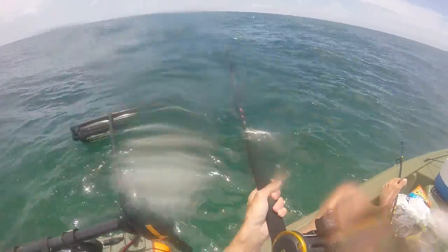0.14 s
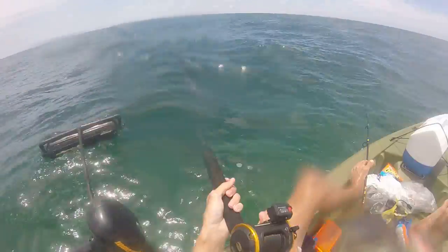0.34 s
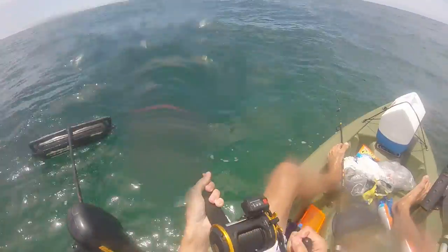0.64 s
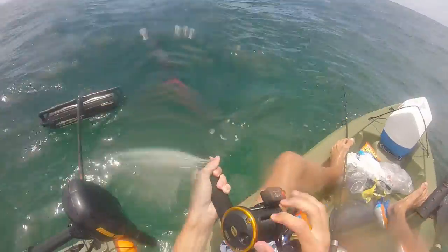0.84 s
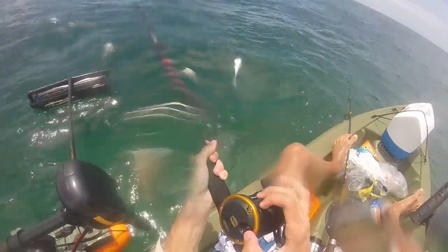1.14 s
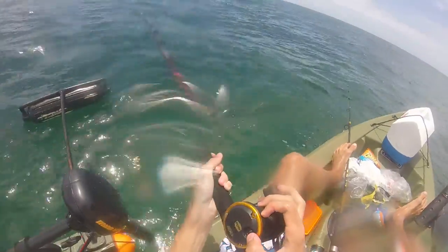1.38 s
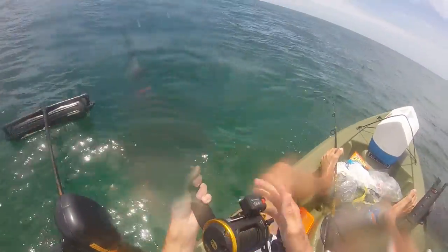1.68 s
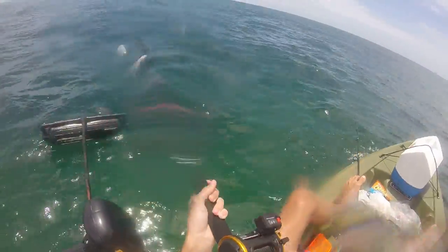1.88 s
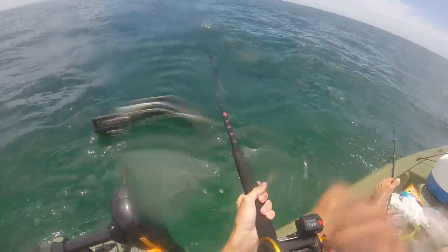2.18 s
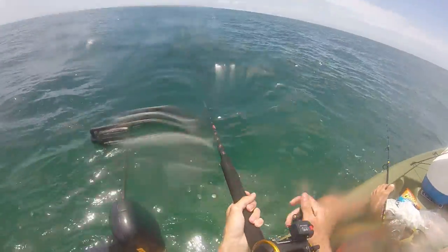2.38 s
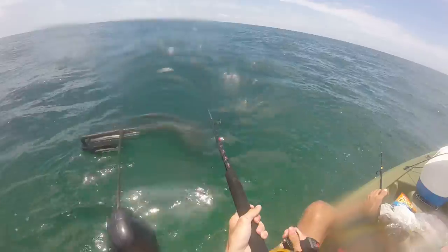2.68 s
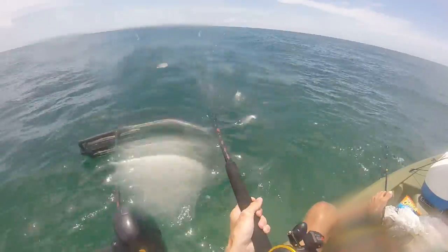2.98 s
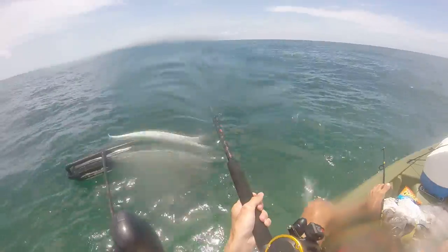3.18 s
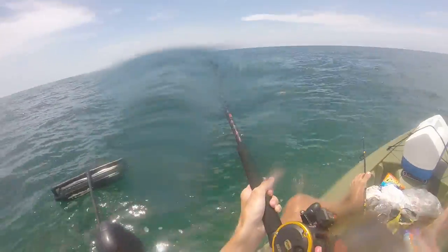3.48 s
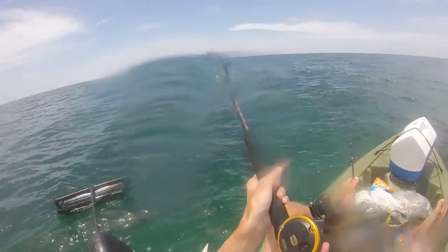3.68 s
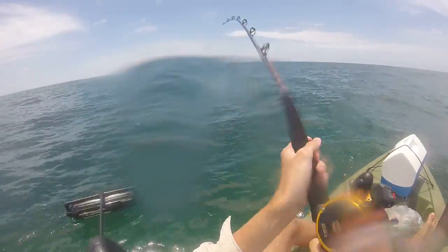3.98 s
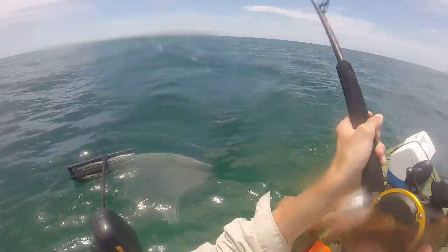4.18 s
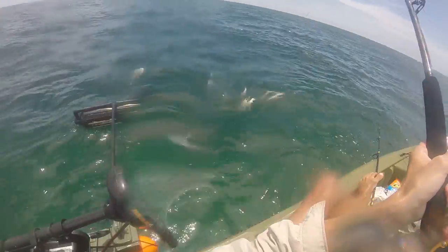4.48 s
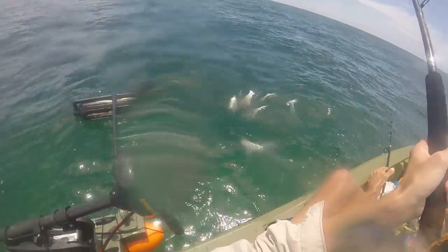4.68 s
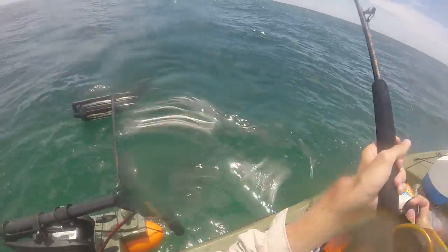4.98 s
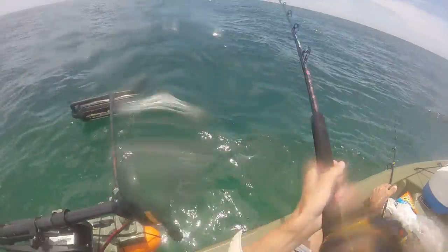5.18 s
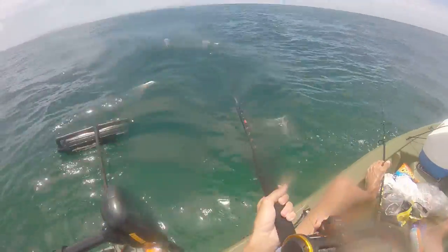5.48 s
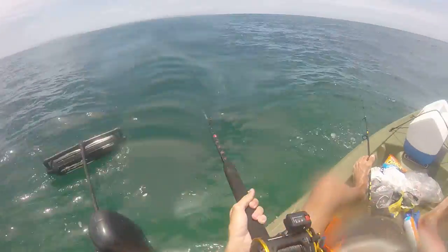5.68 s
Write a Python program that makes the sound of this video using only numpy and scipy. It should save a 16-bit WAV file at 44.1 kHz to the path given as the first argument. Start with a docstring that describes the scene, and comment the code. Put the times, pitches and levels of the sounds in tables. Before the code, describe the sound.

Metallic ratchet clicks from a fishing reel on a small boat come slowly, later whirring fast, with light handling ticks and low wind buffeting.

```python
"""A fishing reel in a small boat at sea, heard by a microphone shut in a waterproof case.
Throughout, wind buffets the case (low noise that swells and fades) and sea and recorder hiss evenly (shaped noise).
From the start, hands tick on the tackle (puffs of noise) and later also bump it (low dying tones).
At 2.1 s line is pulled out slowly: the clicker spring snaps over the gear teeth, and each snap rings the reel.
At 5.0 s it runs out faster, so that the snaps fuse into a buzz, then slows to single snaps again."""
import sys
import numpy as np
from scipy import signal
from scipy.fft import rfft, irfft
from scipy.io import wavfile
from scipy.ndimage import uniform_filter1d

SR = 44100
rng = np.random.default_rng(int(sys.argv[2]) if len(sys.argv) > 2 else 0)


def log_audio(samples):
    """Write samples as a 16-bit WAV file to the path given in sys.argv[1]."""
    # one column per channel
    frames = np.atleast_2d(samples).T
    # limit to full scale, then quantise
    limited = np.clip(frames, -1, 1)
    pcm = np.round(limited * 32767).astype(np.int16)
    wavfile.write(sys.argv[1], SR, pcm)


N = 257932  # length of the sound in samples


def from_db(db):
    """Turns a level in dB into a gain."""
    return 10 ** (np.asarray(db) / 20)


def rms_one(x):
    """Scales a sound to unit power."""
    return x / np.sqrt(np.mean(x ** 2) + 1e-20)


def band(x, low_hz, high_hz, order=2):
    """Keeps only the pitches between two limits."""
    limits = [low_hz, min(high_hz, .45 * SR)]
    return signal.sosfilt(signal.butter(order, limits, "band", fs=SR, output="sos"), x)


def add(out, s, sound):
    """Mixes a short sound in at a time in seconds."""
    at = round(s * SR)
    out[at:at + len(sound)] += sound[:N - at]


# Slow turns of the spool, each snap heard on its own: (time [s], level [dB])
SLOW_SNAPS = [(2.1071, -31.5), (2.1404, -33.5), (2.171, -34.5), (2.203, -36), (2.232, -35), (2.252, -34),
              (2.2686, -33.5), (2.2843, -28.5), (2.3015, -29), (2.3283, -30.5), (2.4006, -32),
              (2.4272, -32), (2.4441, -30.5), (2.4603, -32), (2.4792, -30), (2.5032, -32), (2.6074, -33.5),
              (5.4822, -30.5), (5.506, -30), (5.5233, -29.5), (5.5377, -29), (5.5515, -28.5),
              (5.5658, -28.5), (5.588, -29.5), (5.7147, -31.5)]
# Speed of the spool in the fast run: (time [s], speed [teeth per s])
RUN_SPEED = [(5.0091, 24.3), (5.062, 77.0), (5.08, 88.8), (5.147, 93.6), (5.202, 162.9), (5.242, 110.7),
             (5.257, 42.8), (5.288, 99.0), (5.385, 130.9), (5.445, 28.2), (5.455, 20)]
# Strength of the snaps in the fast run: (time [s], level [dB])
RUN_LEVEL = [(5.01, -33.5), (5.08, -33), (5.11, -33), (5.17, -28), (5.25, -31), (5.28, -30.5),
             (5.32, -30.5), (5.39, -29), (5.44, -29.5)]
RUN_SPREAD_DB = 1.0  # random difference from tooth to tooth


def teeth():
    """Time and level of every snap: the slow ones, and one for each tooth that passes in the run."""
    s, speed = np.transpose(RUN_SPEED)
    t = np.arange(s[0], s[-1], 1 / SR)
    # adding up the speed counts the teeth; a snap falls on each whole number
    passed = np.cumsum(np.interp(t, s, speed)) / SR
    times = np.interp(np.arange(int(passed[-1]) + 1), passed, t)
    levels_db = np.interp(times, *np.transpose(RUN_LEVEL))
    levels_db = levels_db + RUN_SPREAD_DB * rng.standard_normal(len(times))
    snaps = np.vstack([SLOW_SNAPS, np.transpose([times, levels_db])])
    return snaps[np.argsort(snaps[:, 0])]


# Ringing modes of the reel body, t60 being the time to fall by 60 dB if nothing else damped them:
# (pitch [Hz], level [dB], build-up [ms], t60 [ms])
REEL_MODES = [(1730, -24.5, 0.66, 11), (2103, -8, 2.74, 64), (2790, -6.5, 1.87, 28),
              (3458, 0.5, 0.97, 16.6), (4060, -14, 0.68, 8.3), (4622, -1.5, 1.07, 107),
              (5200, -8.5, 0.18, 21), (5687, 0, 0.73, 14.7), (6290, -14, 1.3, 23), (7380, -5.5, 0.13, 16),
              (7980, -1, 0.41, 5.9), (8620, -0.5, 0.18, 9.2), (9050, -5, 0.24, 10), (9970, -3, 0.7, 8.1),
              (11070, -14.5, 0.51, 12), (11880, -11, 0.23, 14.5), (12600, -15, .25, 10.5),
              (13500, -20, .2, 12), (14500, -24, 0.3, 10), (15600, -32, .2, 12)]
# Colour of the ring as the reel tilts, against the modes near 5.7 kHz: (time [s], near 2.2 kHz [dB],
# near 3.4 kHz [dB], near 4.6 kHz [dB], near 8 kHz [dB], above 10 kHz [dB])
COLOUR = [(2.107, -9, -2, -0.5, 1.5, -2), (2.14, 3.5, 4.5, 1, 2.8, 1), (2.235, -3, 6, 1, 2.5, 1),
          (2.29, 0.5, -2, 1, 2, -4), (2.43, 0, -3, -0.5, -1.2, 0.5), (2.49, 0, -7, 4, 3, 0),
          (2.61, 3.5, -4, 1, -2.5, 0), (5.01, -1, -4.3, -0.5, -2.5, 9), (5.11, 6, -1, 0.5, 1, 8),
          (5.16, 1.5, -4.5, 1.5, -2, 4), (5.21, 4, -4, 0.5, -4.5, -2), (5.25, 1.5, -5, 1, -5.5, 1.1),
          (5.31, 0, 4, -1.5, -1, 1), (5.39, -3, -1.5, -3, -6, -1.5), (5.43, -1, -2.5, -0.5, -4, -4),
          (5.54, -1.5, -3.5, 0.5, -3, -2), (5.6, 0, -4, 1, -2.5, -2), (5.72, -1, -4, 0, -1.5, -3.5)]
# Echoes off the hull: (delay [ms], level [dB])
ECHOES = [(9.9, -26.5)]
# the spring lands on the next flank and stifles the ring: 1 dB lost by then, growing as time squared
DAMPING_MS = 1.41
# the casing scatters each mode into a rough tail: level, t60 at 4 kHz, its power of pitch, half width
LINGER_DB, LINGER_T60_MS, LINGER_SLOPE, LINGER_HZ = -9.5, 24.6, -0.62, 257
# the ring wanders as the reel tilts, neighbouring teeth alike; pitch as a fraction
STRENGTH_SPREAD_DB, PITCH_SPREAD = .9, .006
TREBLE_WANDER = .018  # fraction of pitch: modes above 9 kHz also slide, over several teeth
PHASE_SPREAD = .85  # radians: the spring strikes nearly the same way each time


def clicker():
    """Every snap sets all modes of the reel going; the low ones mostly take longer to build up."""
    out, ms = np.zeros(N), np.arange(1600) * 1000 / SR
    hz, level_db, rise_ms, t60_ms = np.transpose(REEL_MODES)[:, :, None]
    snaps = teeth()
    when, *groups = np.transpose(COLOUR)

    # how the clear ring and the rough tail of each mode grow and die
    swell = 1 - np.exp(-(ms / np.maximum(rise_ms, .02)) ** 2)
    struck = swell * from_db(-60 * ms / t60_ms - (ms / DAMPING_MS) ** 2)
    linger_t60_ms = LINGER_T60_MS * (hz / 4000) ** LINGER_SLOPE
    linger = swell * from_db(LINGER_DB - 60 * ms / linger_t60_ms)
    white = rng.standard_normal((len(REEL_MODES), len(snaps), len(ms)))
    rough = [rms_one(band(w, f - LINGER_HZ, f + LINGER_HZ)) for w, f in zip(white, hz[:, 0])]

    # chance for strength, pitch and phase, averaged over neighbouring snaps
    chance = rng.standard_normal((len(snaps), 3, len(REEL_MODES), 1))
    chance = np.sqrt(3) * uniform_filter1d(chance, size=3, axis=0)
    slide = rng.standard_normal((len(snaps), len(REEL_MODES), 1))
    slide = rms_one(uniform_filter1d(slide, size=7, axis=0))
    chance[:, 1] += TREBLE_WANDER / PITCH_SPREAD * slide * (hz > 9000)
    own_phase = np.pi * np.arange(len(REEL_MODES))[:, None]  # neighbouring modes start in opposite sense

    group_hz = [2200, 3400, 4600, 5700, 7400, 8700, 10000]
    for (s, snap_db), (strength, pitch, phase), tail in zip(snaps, chance, np.swapaxes(rough, 0, 1)):
        lowest_db, low_db, middle_db, high_db, top_db = (np.interp(s, when, group) for group in groups)
        group_db = [lowest_db, low_db, middle_db, 0, high_db, high_db, top_db]
        tilt_db = np.interp(hz, group_hz, group_db)
        mode_hz = hz * (1 + PITCH_SPREAD * pitch)
        tone = np.sin(2 * np.pi * mode_hz * ms / 1000 + own_phase + PHASE_SPREAD * phase)
        rings = struck * tone + linger * tail
        mode_db = snap_db + level_db + tilt_db + STRENGTH_SPREAD_DB * strength
        add(out, s, np.sum(from_db(mode_db) * rings, axis=0))

    heard = out.copy()
    for lag_ms, echo_db in ECHOES:
        add(heard, lag_ms / 1000, from_db(echo_db) * out)
    return heard


# Hands and tackle: (time [s], level [dB], centre pitch [Hz], width [octaves])
TICKS = [(0.07, -49, 3980, 1.6), (.098, -48.5, 5730, 0.28), (0.099, -49, 1200, 1.6),
         (.112, -47.5, 2900, 0.53), (0.113, -50.5, 595, 1.4), (.314, -51.5, 2660, .2),
         (1.125, -42, 2450, 0.55), (1.125, -51, 6500, .8), (1.127, -46.5, 500, 0.94),
         (1.136, -47, 3500, 1.7), (1.23, -53, 1660, .3), (1.237, -39, 3400, 1.07), (1.238, -48, 9650, .62),
         (1.305, -44, 2140, 0.089), (1.307, -48, 5000, 1.6), (1.307, -44.5, 8400, 0.13),
         (1.318, -45, 4770, 1.5), (1.926, -48.5, 2020, 0.3), (1.938, -42.5, 5430, 1.1),
         (1.95, -47, 4600, .1), (2.887, -54, 4000, 1.3), (2.907, -43, 2600, 1.4),
         (4.381, -46.5, 8500, 0.65), (4.382, -50, 2070, 0.18), (4.543, -52, 6300, 1.2),
         (4.555, -45, 3380, 0.4), (4.946, -49.5, 2320, .57), (5.205, -51, 520, 0.96),
         (5.617, -42.5, 3300, .66)]
TICK_T60_MS, TICK_SLOPE = 16.8, -0.84  # at 4 kHz and 1 octave; low ticks last longer, by this power of pitch
TICK_RING = -0.19  # narrow ticks ring longer, by this power of the width


def ticks():
    """Short dying puffs of noise, each in the band of what was touched."""
    out, ms = np.zeros(N), np.arange(4000) * 1000 / SR
    whites = rng.standard_normal((len(TICKS), len(ms)))
    for (s, level_db, hz, octaves), white in zip(TICKS, whites):
        t60_ms = TICK_T60_MS * (hz / 4000) ** TICK_SLOPE * octaves ** TICK_RING
        half_width = 2 ** (octaves / 2)
        puff = rms_one(band(white, hz / half_width, hz * half_width))
        onset = 1 - np.exp(-ms / 0.5)
        add(out, s, puff * onset * from_db(level_db - 60 * ms / t60_ms))
    return out


# Soft bumps through the hull: (time [s], level [dB], pitch [Hz], t60 [ms])
BUMPS = [(1.931, -41.5, 233, 66), (1.935, -37.5, 417, 41), (4.43, -37, 132, 93), (4.44, -40.5, 233, 86),
         (4.648, -38.5, 125, 113)]


def bumps():
    """A soft push sets one low, damped panel mode going."""
    out, ms = np.zeros(N), np.arange(9000) * 1000 / SR
    for s, level_db, hz, t60_ms in BUMPS:
        tone = np.sin(2 * np.pi * hz * ms / 1000)
        onset = 1 - np.exp(-ms / 5.6)
        add(out, s, tone * onset * from_db(level_db - 60 * ms / t60_ms))
    return out


# Wind on the case: (time [s], slow heave level [dB], flutter level [dB])
WIND = [(0.0, -51, -40.5), (0.19, -32.5, -53), (0.34, -45.5, -68), (0.45, -34.5, -41), (0.54, -48.5, -70),
        (0.8, -39.5, -43.5), (1.02, -39, -62), (1.16, -55, -49), (1.25, -37.5, -50), (1.5, -46.5, -64),
        (2.04, -38.5, -39.5), (2.15, -46.5, -53.5), (2.92, -45.5, -51.5), (3.01, -35.5, -46),
        (3.21, -53, -57), (3.26, -40.5, -51), (3.96, -48.5, -50), (4.32, -32.5, -45), (4.59, -48, -56.5),
        (5.11, -47.5, -48.5), (5.28, -32.5, -43.5), (5.85, -45, -56)]


def wind():
    """Pressure lumps on the case, in two ranges whose strength follows the gusts."""
    s, heave_db, flutter_db = np.transpose(WIND)
    out, white = 0, rng.standard_normal((2, N + SR))  # one spare second lets the filters settle
    ranges_hz = ((7, 19.2), (22, 42.5))
    for noise, level_db, (low_hz, high_hz) in zip(white, (heave_db, flutter_db), ranges_hz):
        lumps = band(noise, low_hz, high_hz, order=3)
        # lumps follow one another at a fairly even size
        power = uniform_filter1d(lumps ** 2, size=SR // 12)
        size = np.sqrt(uniform_filter1d(power, size=SR // 12))
        lumps = band(lumps / size, low_hz * 0.51, high_hz * 1.35, order=3)[SR:]
        out = out + rms_one(lumps) * from_db(np.interp(np.arange(N) / SR, s, level_db))
    return out


# Colour of the sea and the recorder hiss, before scaling: (pitch [Hz], relative level per Hz [dB])
SEA_COLOUR = [(26, -20.5), (45, -9), (56, -9), (70, -11.5), (129, -12.5), (372, -19), (411, -19.5),
              (723, -23.5), (925, -24), (4570, -34.5), (13500, -51), (14900, -57), (16000, -71)]
SEA_DB = -54.5  # level of the whole noise


def sea():
    """Smooth, steady noise that falls towards the treble."""
    hz = np.maximum(np.arange(N // 2 + 1) * SR / N, 1)
    point_hz, point_db = np.transpose(SEA_COLOUR)
    colour_db = np.interp(np.log(hz), np.log(point_hz), point_db)
    noise = irfft(rfft(rng.standard_normal(N)) * from_db(colour_db), N)
    return from_db(SEA_DB) * rms_one(noise)


def scene():
    """Everything reaches one microphone."""
    return (clicker() + ticks() + bumps() + wind() + sea())[None]


CUTOFF_HZ = 16300


def record(dry):
    """A steep low-pass cuts the top of the treble."""
    return signal.sosfilt(signal.ellip(12, .5, 70, CUTOFF_HZ, fs=SR, output="sos"), dry)


dry = scene()
out = record(dry)
log_audio(out)
```